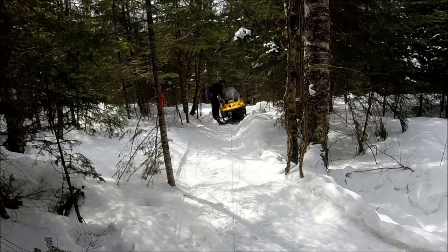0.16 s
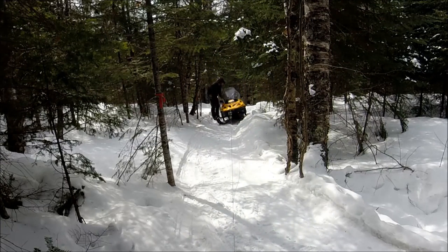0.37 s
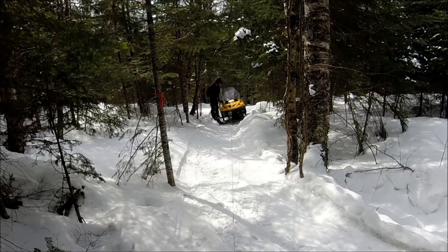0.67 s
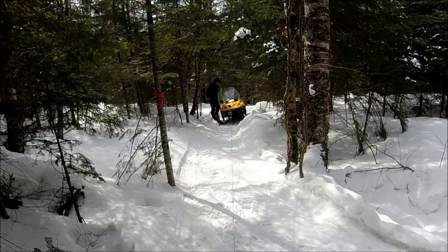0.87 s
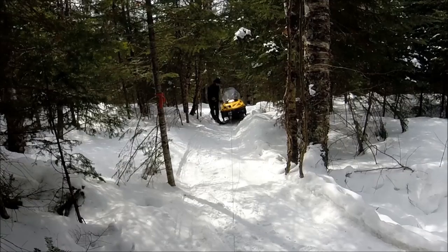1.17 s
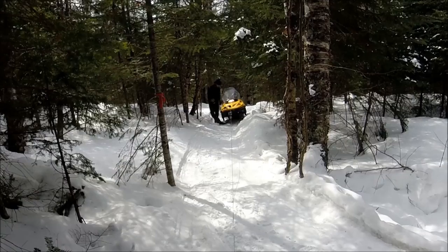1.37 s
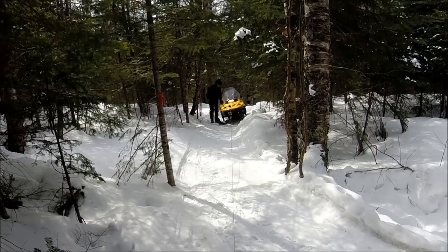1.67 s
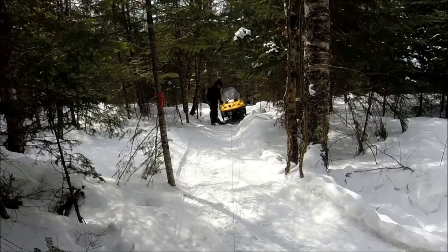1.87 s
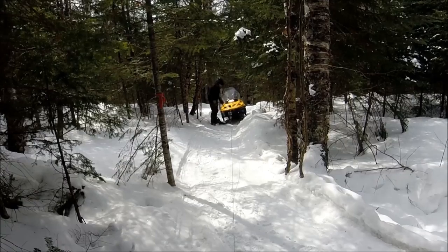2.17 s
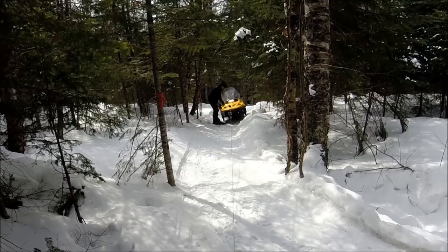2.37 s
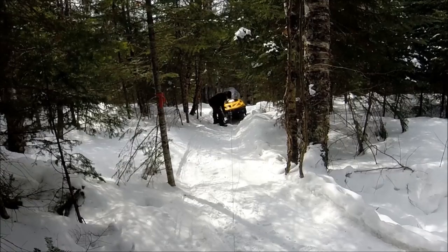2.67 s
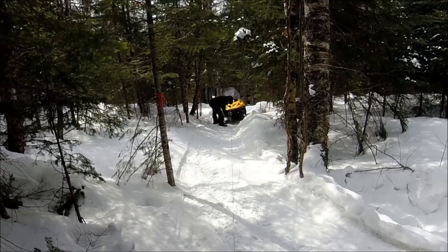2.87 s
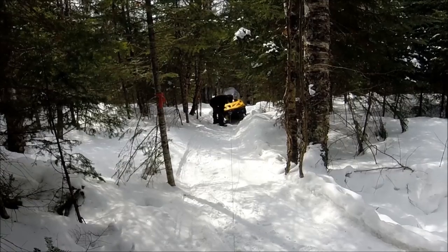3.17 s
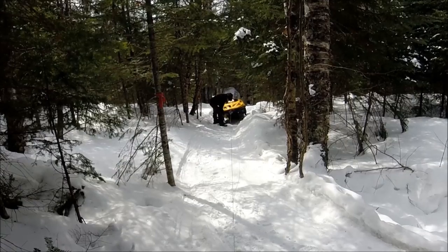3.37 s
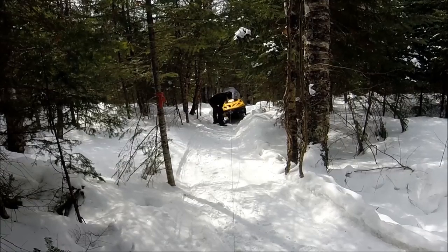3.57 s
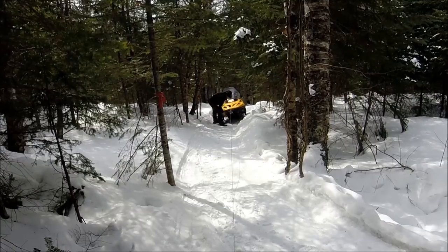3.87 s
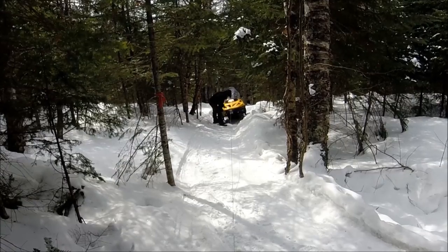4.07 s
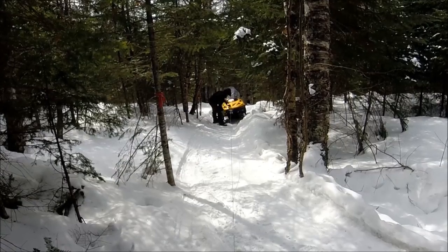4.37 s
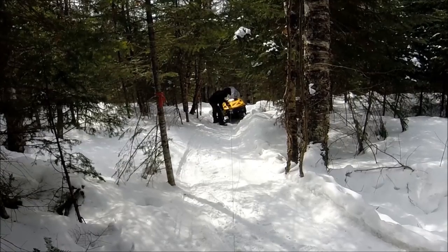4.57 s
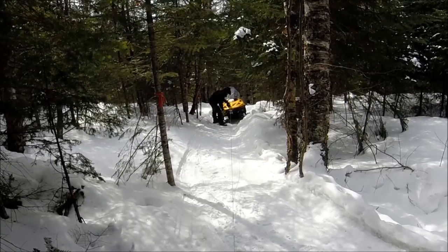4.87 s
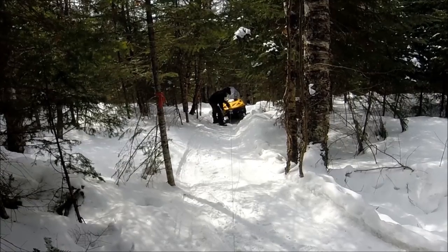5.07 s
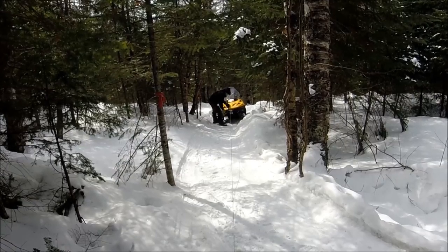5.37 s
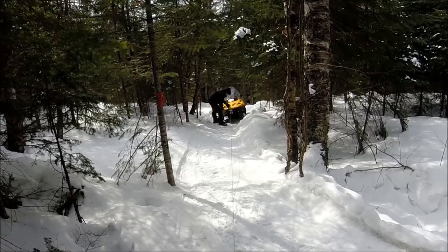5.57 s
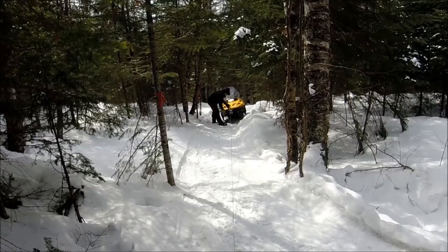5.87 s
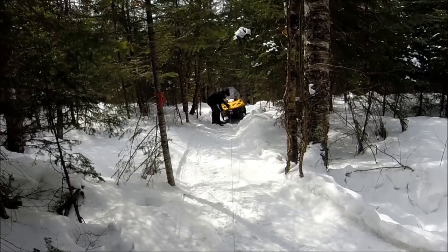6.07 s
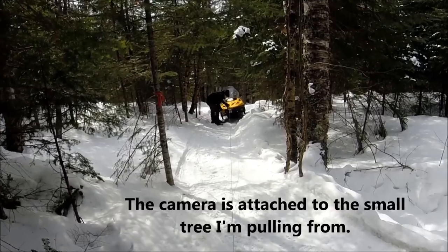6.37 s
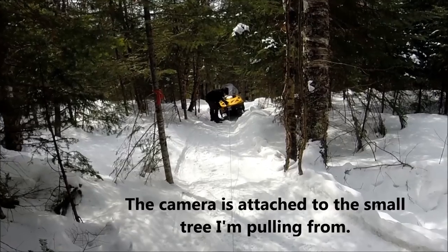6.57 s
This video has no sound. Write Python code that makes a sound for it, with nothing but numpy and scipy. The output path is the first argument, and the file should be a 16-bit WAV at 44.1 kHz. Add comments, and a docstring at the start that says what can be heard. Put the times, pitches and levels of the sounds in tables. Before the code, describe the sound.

A snowmobile cranks, catches and idles unevenly in a forest, then an electric winch starts whining and its line creaks.

```python
"""Over a low forest rumble, a two-stroke snowmobile down a snowy trail grinds on its starter and catches.
It idles unevenly: the pistons pump on every stroke, but only some strokes fire. From about 3 s a slack
winch line rubs and ticks on the small tree that carries the microphone. At 6.2 s the sound drops out for
an instant. Then an electric winch takes up load; its whine and the creak of the taut line travel into
the tree."""
import sys
import numpy as np
from scipy import signal
from scipy.fft import rfft, irfft
from scipy.io import wavfile
from scipy.ndimage import uniform_filter1d, minimum_filter1d

SR = 44100
rng = np.random.default_rng(int(sys.argv[2]) if len(sys.argv) > 2 else 0)


def pcm_store(signal):
    """Save signal as 16-bit PCM."""
    levels = np.round(np.clip(np.atleast_2d(signal), -1, 1) * 32767)
    wavfile.write(sys.argv[1], SR, levels.astype(np.int16).T)


N = 295911
T = np.arange(N) / SR

# nominal crank speed: t/s, rate/(strokes/s)
STROKE_RATE = [(0, 28), (.3, 35), (.7, 36), (1.0, 42), (1.3, 45), (2, 47), (4, 47.5), (6.7, 49)]
# starter grind: f/Hz, relative level/dB
STARTER_SPECTRUM = [(400, -14), (650, -7), (880, -1), (1250, -0.5), (1700, -6), (2300, -15.5), (2850, -22),
                    (3500, -7), (4050, -13.5), (5200, -9), (7000, -24.5), (8800, -25), (10500, -48.5),
                    (15000, -59)]
# starter drive resonances: f/Hz, width/Hz, gain/dB
RING_GEAR_MODES = [(894, 150, -5.5), (1250, 31, -21.5), (1690, 12, -3.5), (3540, 61, -14), (3720, 30, -9),
                   (4500, 80, -8.5), (5350, 45, -9), (8670, 150, -21), (9960, 66, -24)]
# pumping wave: multiple of stroke rate, relative level/dB
PUMP_HARMONICS = [(1, -3.5), (2, -7.5), (3, -13), (4, -19), (5, -31)]
# pumping as the idle settles: t/s, level/dB
PUMP_LEVEL = [(0, -43), (.7, -43), (1.0, -36), (1.55, -39), (1.8, -36), (2.8, -36), (3.1, -35.5),
              (6.7, -34)]
# running gear: f/Hz, relative level/dB
CLATTER_SPECTRUM = [(200, 1), (350, -4), (600, -4), (820, 2.5), (1000, 7), (1100, 0), (1250, -1),
                    (1450, -11.5), (1900, -10), (2750, -27), (3400, -19), (4100, -27), (5300, -23),
                    (7200, -32.5), (14500, -49)]
# engine panel resonances: f/Hz, width/Hz, gain/dB
PANEL_MODES = [(473.3, 8, 2.5), (765, 8.8, 5.5), (957, 30, 0.5), (1170.4, 25, 5), (1529, 20, -9.5),
               (1810, 8.3, -13), (1960, 20, -7), (2330, 15, -11.5), (3147, 42, -15.5), (3540, 28, -25.5)]
# strong firings: t/s, strength/dB, strokes fired in a row
COUGHS = [(.136, -8.5, 1), (.179, -1, 2), (.24, 1.5, 1), (.326, -5, 1), (.383, -5.5, 1), (.467, -2, 1),
          (.632, -0.5, 1), (.794, -1.5, 1), (.946, 2, 1), (1.017, 0, 1), (1.135, 0, 2), (1.272, -1, 2),
          (1.425, 1, 2), (1.577, 3.5, 1), (1.708, 4.5, 1), (1.813, -1.5, 1), (2.152, -2, 2), (2.43, 1, 1),
          (2.537, -2.5, 2), (2.666, -0.5, 1), (2.794, 0.5, 1), (2.966, -2.5, 2), (3.091, -3, 2),
          (3.475, -2, 1), (3.582, -2.5, 2), (3.708, 0, 2), (3.834, -1.5, 2), (3.94, -5.5, 2), (4.131, 1, 1),
          (4.301, -2, 2), (4.427, 3, 1), (4.576, 0, 1), (4.743, 0, 2), (4.867, 1, 1), (4.929, 3.5, 1),
          (5.033, 3.5, 1), (5.093, 3, 1), (5.191, 4, 1), (5.372, -0.5, 2), (5.529, 4, 2), (5.687, 5, 1),
          (5.846, 5.5, 1), (6.008, 4.5, 1), (6.172, 5, 1)]
# muffler resonances: f/Hz, width/Hz, gain/dB
MUFFLER_MODES = [(89.8, 48, -1.5), (143.8, 28.7, -3), (187.6, 10.5, -4.5), (255, 39, -14), (410, 16, -8.5),
                 (473.6, 32, -0.5), (498.8, 21.6, 8)]
# exhaust gas jet: f/Hz, relative level/dB
RASP_SPECTRUM = [(300, 14.5), (520, 12), (900, 11.5), (1400, 4.5), (1900, 5.5), (2700, -5.5), (3450, 1),
                 (4100, -1.5), (4900, -2), (6200, -5), (7300, -15), (8700, -13), (9500, -38.5),
                 (14500, -46.5)]
# hot exhaust pipe resonances: f/Hz, width/Hz, gain/dB
PIPE_MODES = [(1825, 23, 13.5), (3387, 33, 7), (5010, 380, -0.5), (8640, 380, -4.5)]
# slack line on the trunk: t/s, level/dB
RUB_LEVEL = [(2.8, -70), (3.3, -50.5), (4.05, -55), (4.17, -45.5), (4.4, -50), (5.5, -55), (6.3, -72)]
# path through line and tree: f/Hz, relative level/dB
TREE_SPECTRUM = [(90, -13.5), (220, -14.5), (370, -33), (445, 1.5), (530, -30), (720, -18), (810, 2),
                 (925, 3), (1040, -16.5), (1350, -36), (1550, -24.5), (1850, -37), (5500, -49.5),
                 (14000, -83)]
# line shifting on bark: t/s, knock/dB, crackle/dB, crackle decay/s
TICKS = [(4.299, -23.5, -39.5, 0.0023), (6.368, -46.5, -47.5, 0.017), (6.457, -46.5, -52, 0.0036),
         (6.532, -34, -37.5, 0.029), (6.641, -36, -41.5, .004), (6.695, -38.5, -37.5, 0.0057)]
# winch whine: multiple of motor pitch, relative level/dB
WHINE_HARMONICS = [(1, -1), (2, -3), (3, -1), (4, -15), (5, -15.5), (6, -38)]
# taut line creaks: t/s, level/dB, half length/s
CREAKS = [(6.358, -10.5, 0.0072), (6.368, -8.5, .0025), (6.389, 0, 0.0081), (6.412, -8, 0.01),
          (6.449, -12.5, 0.016), (6.482, -10, 0.011), (6.506, -8, 0.0071), (6.618, -10, 0.015),
          (6.69, -2.5, 0.0048), (6.704, -8.5, 0.006)]

LOAD_ON_S, LOAD_RISE_S = 6.343, 0.044


def amp(db):
    """Decibels to gain."""
    return 10 ** (np.asarray(db) / 20)


def unit(x):
    """Scale to rms 1."""
    return x / np.sqrt(np.mean(x ** 2))


def curve(rows):
    """Linear interpolation of (t/s, value) rows."""
    return np.interp(T, *np.transpose(rows))


def noise():
    """White noise."""
    return rng.standard_normal(N)


def walk(cutoff_hz):
    """Smooth random drift, rms 1."""
    return unit(signal.sosfilt(signal.butter(2, cutoff_hz, fs=SR, output="sos"), noise()))


def grains(per_s, spread_db):
    """Dense tiny impacts of uneven size, rms 1."""
    return unit((rng.random(N) < per_s / SR) * noise() * amp(spread_db * noise()))


def colour(x, spectrum):
    """Shape by (f/Hz, level/dB) rows, rolled off below the first; rms 1."""
    hz, db = np.transpose(spectrum)
    bin_hz = np.maximum(np.fft.rfftfreq(N, 1 / SR), 1)
    gain = amp(np.interp(np.log(bin_hz), np.log(hz), db)) * np.minimum(bin_hz / hz[0], 1) ** 2
    return unit(irfft(rfft(x) * gain, N))


def ring(x, modes):
    """Parallel resonances."""
    return sum(amp(db) * signal.lfilter(*signal.iirpeak(hz, hz / width_hz, fs=SR), x)
               for hz, width_hz, db in modes)


def bursts(times_s, levels_db, rise_s, decay_s):
    """Envelope: Gaussian rise to each time, exponential decay after."""
    envelope = np.zeros(N)
    for at_s, peak in zip(times_s, amp(levels_db)):
        near = slice(*np.searchsorted(T, [at_s - 10 * rise_s, at_s + 10 * decay_s]))
        age_s = T[near] - at_s
        envelope[near] += peak * np.exp(np.where(age_s < 0, -(age_s / rise_s) ** 2, -age_s / decay_s))
    return envelope


def forest(x, wet_db, t60_s):
    """Trunks scatter a thin, short tail; snow swallows the rest."""
    age_s = T[:SR // 2]
    tail = rng.standard_normal(len(age_s)) * amp(-60 * age_s / t60_s) * (age_s > .012)
    band = signal.butter(1, [250, 6000], "band", fs=SR, output="sos")
    tail = signal.sosfilt(band, tail / np.linalg.norm(tail))
    return x + amp(wet_db) * signal.fftconvolve(x, tail)[:N]


def air(level_db=-50):
    """Low, slowly swelling rumble of the open forest."""
    spectrum = [(28, -31.5), (60, -4.5), (150, -11.5), (400, -29), (3000, -58.5), (15000, -57.5)]
    return colour(noise(), spectrum) * amp(level_db + 0.5 * walk(2.3))


def crank_strokes():
    """Running stroke count; a whole number fits between two coughs."""
    times_s = np.r_[0, np.array(COUGHS)[:, 0], T[-1]]
    rate_hz = np.interp((times_s[1:] + times_s[:-1]) / 2, *np.transpose(STROKE_RATE))
    counts = np.maximum(np.round(np.diff(times_s) * rate_hz), 1)
    return np.interp(T, times_s, np.r_[0, np.cumsum(counts)])


def starter(strokes, off_s=0.23, release_s=0.024, swell_db_per_s=17, sag_hz_per_s=400):
    """Pinion grinds on the ring gear with a sinking squeal; a panel rings on as the engine catches."""
    run_s = np.minimum(T, off_s)
    throb_db = 1.5 * np.cos(2 * np.pi * strokes + 2.3)  # once per compression
    level_db = -36.5 + swell_db_per_s * (run_s - off_s) + throb_db
    envelope = amp(level_db) * np.exp(-(T - run_s) / release_s)
    teeth = grains(7000, spread_db=1.5)
    # the contact shifts, so the modes take turns
    chatter = sum(ring(teeth, [mode]) * amp(3.4 * walk(8.7)) for mode in RING_GEAR_MODES)
    chatter = colour(chatter, [(500, 3.5), (10000, 0.5), (14000, -7.5)])
    grind = amp(-2) * colour(teeth, STARTER_SPECTRUM) + amp(-5) * chatter
    squeal_hz = (1652 - sag_hz_per_s * run_s) * (1 + 0.015 * walk(150))
    squeal = np.sin(2 * np.pi * np.cumsum(squeal_hz) / SR) * amp(-12 + 1.4 * walk(60))
    panel_envelope = bursts([.22], [-46], rise_s=0.08, decay_s=0.65) * amp(4.3 * walk(43))
    panel = np.sin(2 * np.pi * 476 * T) * panel_envelope
    return forest((grind + squeal) * envelope, wet_db=-12.5, t60_s=0.64) + panel


def pumping(crank_rad, wander_rad=.1, scatter_db=1.5):
    """Pressure builds slowly and collapses as a port opens; no two strokes are alike."""
    wave = sum(-amp(db + 1.8 * walk(18)) * np.sin(k * (crank_rad + wander_rad * walk(21)))
               for k, db in PUMP_HARMONICS)
    return unit(wave) * amp(curve(PUMP_LEVEL) + scatter_db * walk(9))


def clatter(crank_rad, build_s=0.13, load_db=5):
    """Running gear and panels rattle with each stroke, louder under winch load."""
    throb_db = np.cos(crank_rad)
    gear = colour(grains(9000, spread_db=1.5) * amp(throb_db), CLATTER_SPECTRUM)
    taps = grains(2500, spread_db=2.8) * amp(2 * throb_db)
    # oiled parts tap softly: little treble
    taps = colour(taps, [(200, -2.5), (3400, -3.5), (7000, -13.5), (14000, -26.5)])
    rattle = amp(-46.5) * gear + amp(-51) * unit(ring(taps, PANEL_MODES))
    return rattle * amp(load_db * winch_load()) * (1 - np.exp(-T / build_s))


def firings(strokes, weak_strokes=3, strong_strokes=4, choke_off_s=1.5, weak_db=-4.5, scatter_db=2):
    """Times/s, strengths/dB: each cough, then weak firings until the next strong charge gathers."""
    starts = np.round(np.interp([at_s for at_s, _, _ in COUGHS] + [T[-1]], T, strokes))
    fired = []
    for (at_s, db, count), first, following in zip(COUGHS, starts, starts[1:]):
        run = first + np.arange(round(count))
        # a choked, rich mixture gathers sooner; a double firing drains the crankcase for one more stroke
        gather_strokes = weak_strokes if at_s < choke_off_s else strong_strokes + len(run) - 1
        weak = np.arange(run[-1] + weak_strokes, following - gather_strokes + 1, weak_strokes)
        fired += [(k, db) for k in run]
        fired += [(k, weak_db + scatter_db * rng.standard_normal()) for k in weak]
    fired_strokes, strength_db = np.transpose(fired)
    return np.interp(fired_strokes, strokes, T), strength_db


def exhaust_pops(times_s, strength_db, growth_db_per_db=0.52):
    """Pressure dips just ahead of each blow-down; both ring the muffler."""
    pop_db = growth_db_per_db * strength_db
    dip = bursts(times_s - .0022, pop_db - 17, rise_s=0.001, decay_s=0.00072)
    blow = bursts(times_s, pop_db - 19.5, rise_s=0.0017, decay_s=0.0031)
    return ring(blow - dip, MUFFLER_MODES)


def exhaust_rasp(times_s, strength_db):
    """Each firing's gas jet rasps and rings the hot pipe."""
    envelope = bursts(times_s - .002, strength_db - 46.5, rise_s=0.0054, decay_s=0.026)
    jet = grains(14000, spread_db=1.5) * envelope
    return np.std(jet) * (colour(jet, RASP_SPECTRUM) + amp(-12.5) * unit(ring(jet, PIPE_MODES)))


def engine(strokes):
    """Every stroke pumps and rattles; a firing adds a pop and a rasp."""
    crank_rad = 2 * np.pi * strokes
    times_s, strength_db = firings(strokes)
    low = pumping(crank_rad) + exhaust_pops(times_s, strength_db)
    bright = exhaust_rasp(times_s, strength_db) + clatter(crank_rad)
    return low + forest(bright, wet_db=-5.5, t60_s=0.48)


def slack_line():
    """The slack line drags in fits and sounds the tree's resonances."""
    friction = colour(grains(2000, spread_db=4.3), TREE_SPECTRUM)
    return friction * amp(curve(RUB_LEVEL) + 1.8 * walk(13))


def line_ticks(knock_hz=880):
    """The line shifts on the trunk: wooden knock, crackle of bark."""
    knocks, crackle_envelope = np.zeros(N), np.zeros(N)
    for at_s, knock_db, crackle_db, decay_s in TICKS:
        knock_envelope = bursts([at_s + 0.0022], [knock_db], rise_s=0.0021, decay_s=0.0019)
        knocks += knock_envelope * np.sin(2 * np.pi * knock_hz * (T - at_s))
        crackle_envelope += bursts([at_s], [crackle_db], rise_s=0.0015, decay_s=decay_s)
    bark_spectrum = [(1200, 8.5), (2600, 4), (3800, -2), (5500, -6), (9000, -21), (14000, -41.5)]
    return knocks + crackle_envelope * colour(grains(4000, spread_db=1.8), bark_spectrum)


def winch_load():
    """Pull on the line, 0 to 1."""
    return 1 - np.exp(-np.maximum(T - LOAD_ON_S, 0) / LOAD_RISE_S)


def winch(on_s=6.325, spin_up_s=.03, free_hz=340, sag_hz_per_s=72, wander=.006):
    """The motor spins up and sags under load; its gears shake line and tree."""
    age_s = np.maximum(T - on_s, 0)
    motor_hz = free_hz * (1 - np.exp(-age_s / spin_up_s)) - sag_hz_per_s * age_s
    motor_rad = 2 * np.pi * np.cumsum(motor_hz * (1 + wander * walk(70))) / SR
    whine = sum(amp(db + 2.7 * walk(40)) * np.sin(k * motor_rad) for k, db in WHINE_HARMONICS)
    teeth = grains(7000, spread_db=2) * amp(2.6 * np.cos(motor_rad))
    return (amp(-23.5) * whine + amp(-18.5) * colour(teeth, TREE_SPECTRUM)) * winch_load()


def line_creaks(start_hz=836, rise_hz_per_s=157, roughness=0.1):
    """The taut line creaks in short swells, roughened by scraping; pitch climbs with tension."""
    creaks = np.zeros(N)
    for at_s, db, half_s in CREAKS:
        pitch_hz = start_hz + rise_hz_per_s * (at_s - LOAD_ON_S)
        envelope = amp(db) * np.exp(-((T - at_s) / half_s) ** 2)
        creaks += envelope * np.cos(2 * np.pi * (pitch_hz * (T - at_s) + rng.random()))
    return creaks * (1 + roughness * walk(380))


def scene():
    """All sources at one microphone."""
    strokes = crank_strokes()
    snowmobile = engine(strokes) + starter(strokes)
    return (snowmobile + slack_line() + winch() + line_creaks() + line_ticks() + air())[None]


def record(dry, low_hz=12, top_hz=15300, ceiling=.98, gap_s=(6.198, 6.226)):
    """Microphone bass roll-off, peak limiter, brief dropout, treble cut."""
    heard = signal.sosfilt(signal.butter(1, low_hz, "high", fs=SR, output="sos"), dry)
    headroom = ceiling / np.maximum(np.abs(heard), ceiling)
    limiter_gain = uniform_filter1d(minimum_filter1d(headroom, size=401), size=401)
    gate = uniform_filter1d(1. * ((T < gap_s[0]) | (T > gap_s[1])), size=12)
    end_fade = np.minimum((T[-1] - T) / .001, 1)
    lowpass = signal.ellip(10, .2, 90, top_hz, fs=SR, output="sos")
    return signal.sosfilt(lowpass, heard * limiter_gain * gate * end_fade)


dry = scene()
out = record(dry)
pcm_store(out)
```